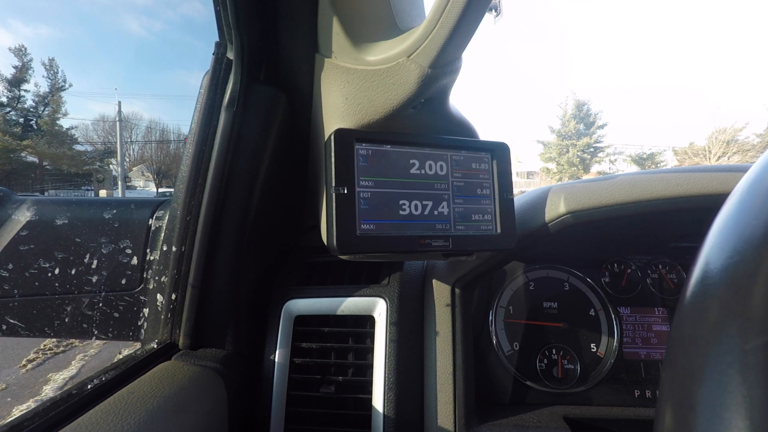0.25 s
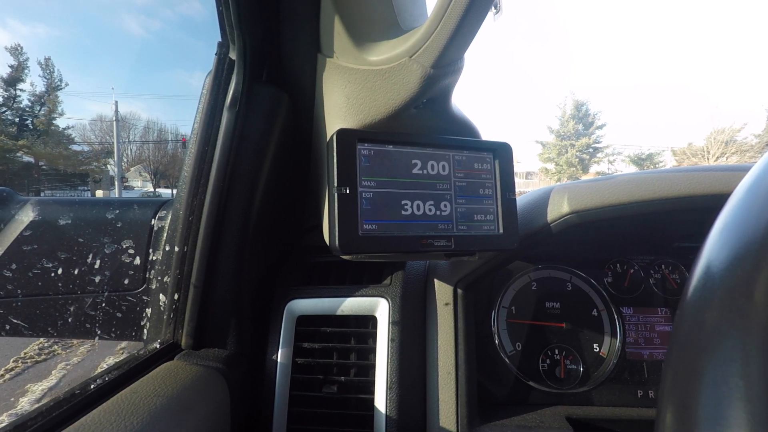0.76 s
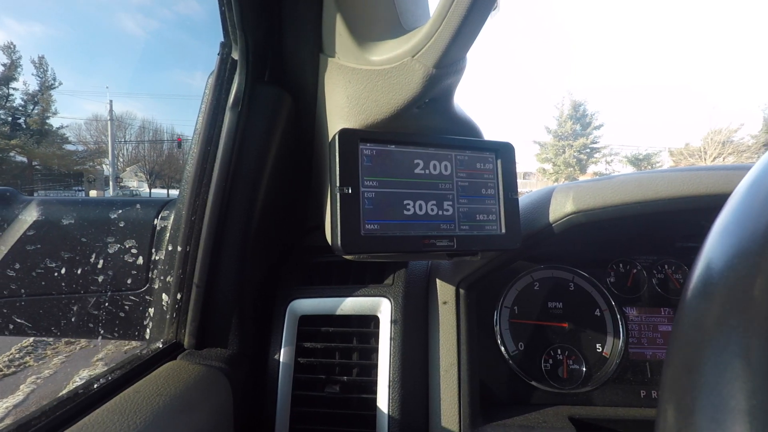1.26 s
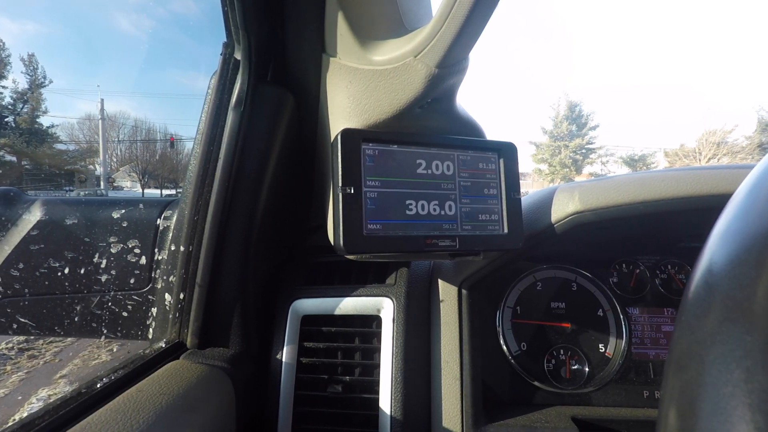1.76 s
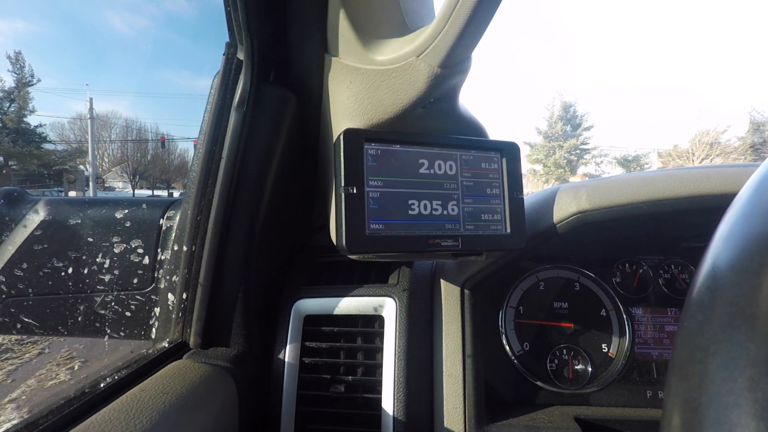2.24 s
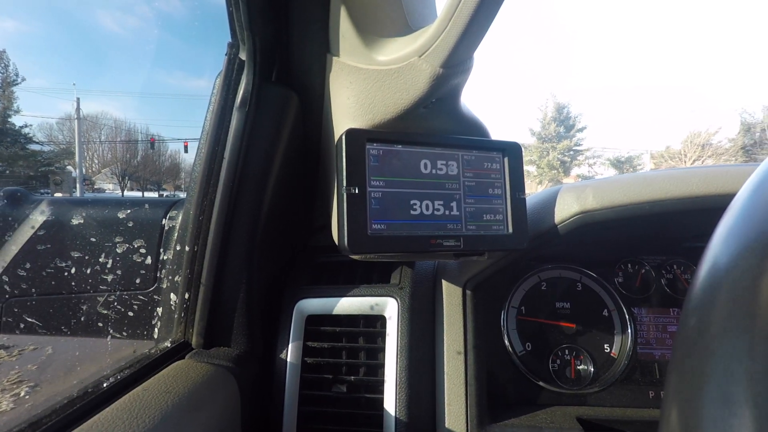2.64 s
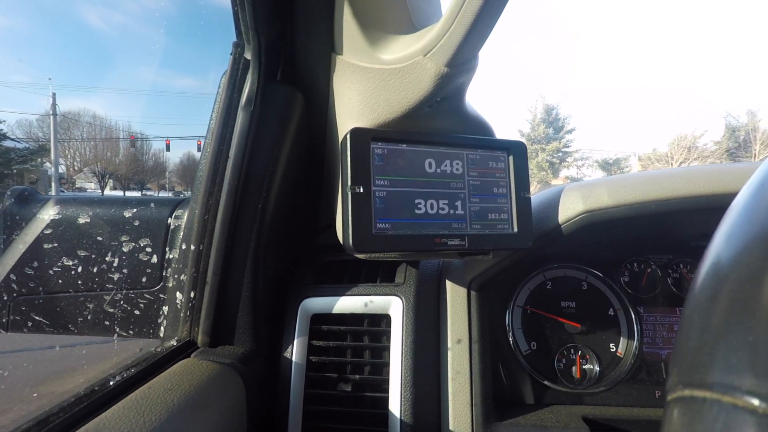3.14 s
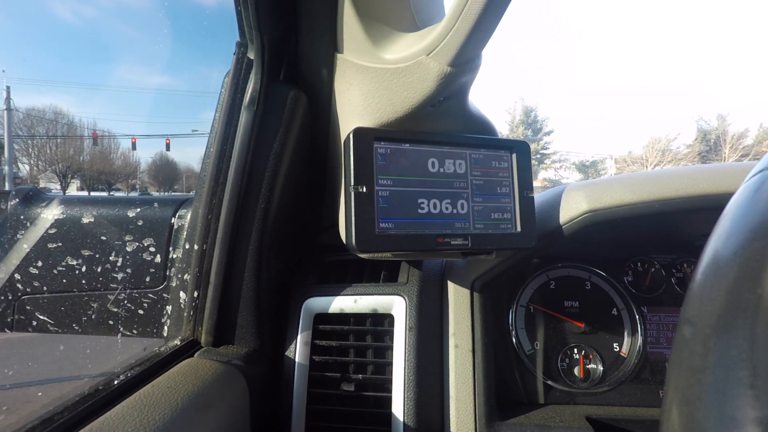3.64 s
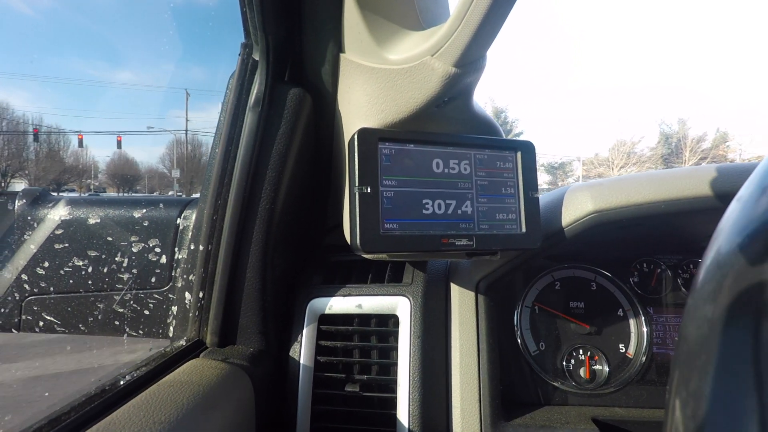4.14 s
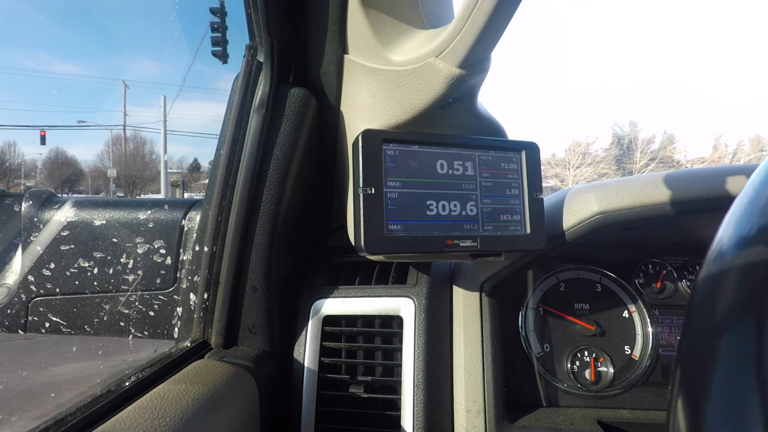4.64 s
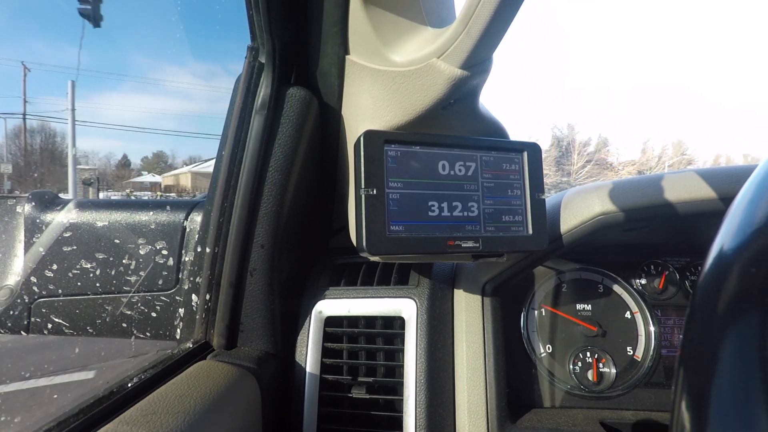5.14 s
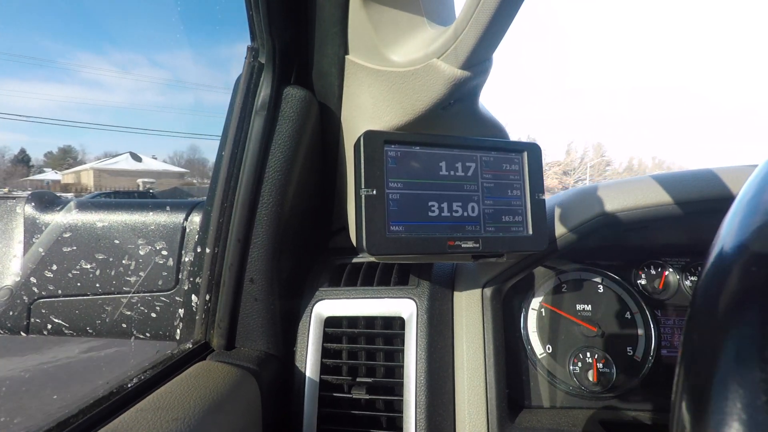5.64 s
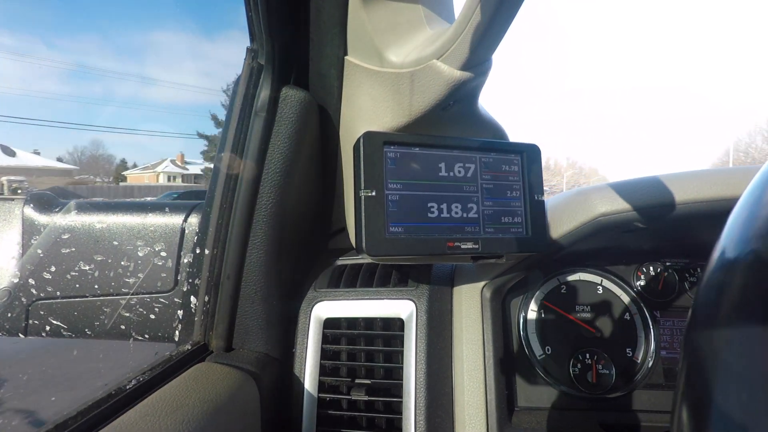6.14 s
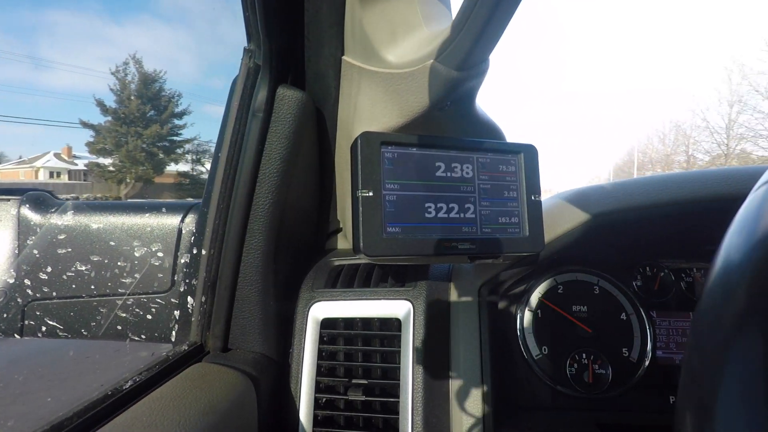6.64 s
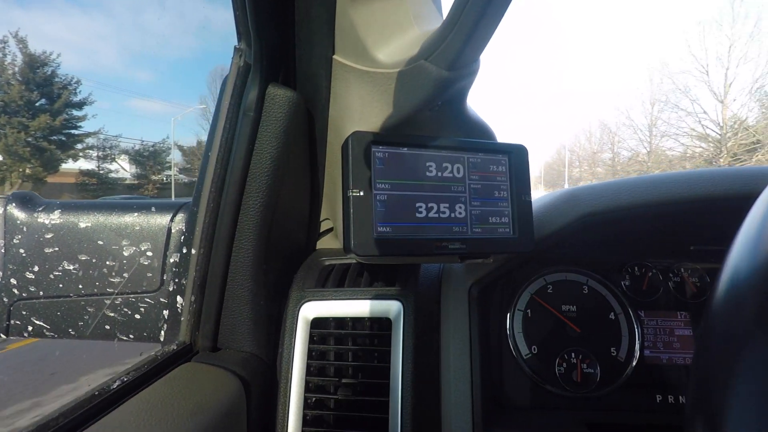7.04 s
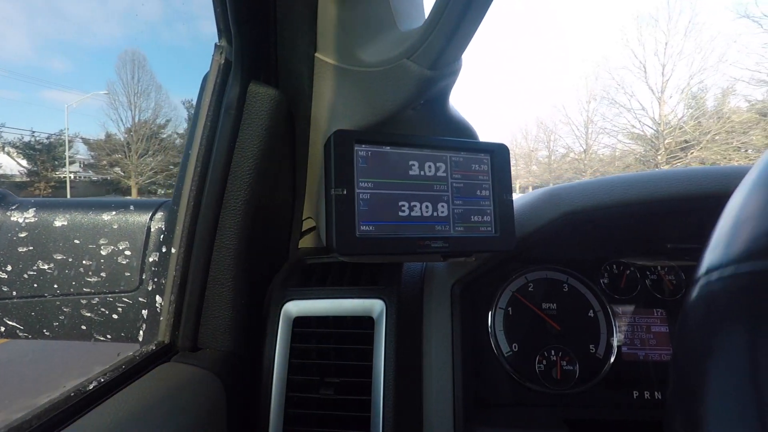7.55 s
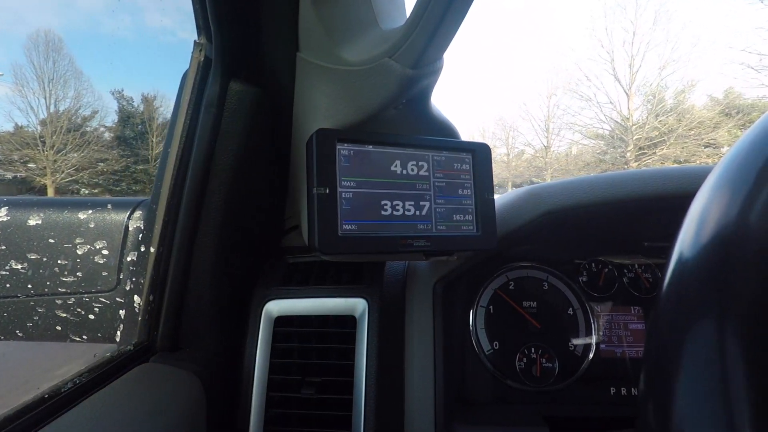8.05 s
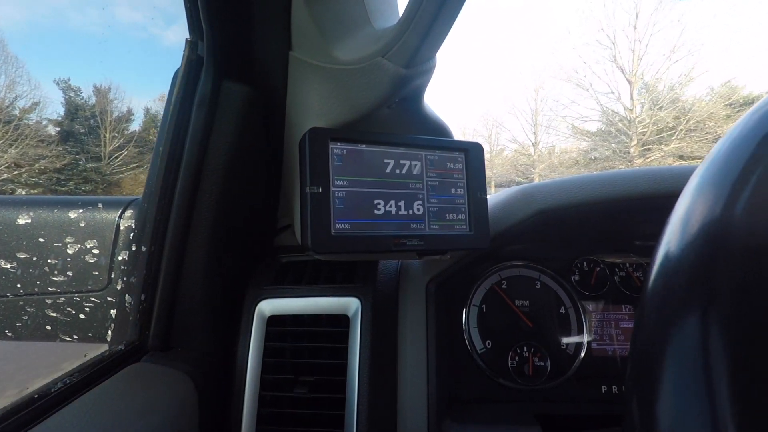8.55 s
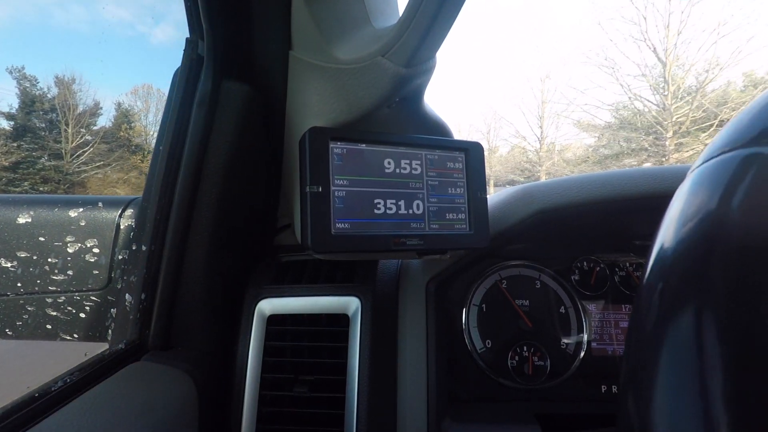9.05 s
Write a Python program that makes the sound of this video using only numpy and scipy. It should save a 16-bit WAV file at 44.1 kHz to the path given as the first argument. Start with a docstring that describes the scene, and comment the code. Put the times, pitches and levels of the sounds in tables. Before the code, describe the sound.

A turbo-diesel pickup idles low, then pulls away and accelerates with a booming exhaust and one upshift, heard inside the cab.

```python
"""A six-cylinder turbo-diesel pickup, heard from one microphone inside the cab. It idles, pulls away
through a turn and accelerates, with one soft upshift. The exhaust booms through the cab's air
resonances, combustion knock rings the block beyond the firewall, and road roar grows with speed.
Close by, the trim ticks and creaks and the steering wheel rubs through a hand; underneath, the body
shakes over bumps."""
import sys
import numpy as np
from scipy import signal
from scipy.fft import rfft, irfft, next_fast_len
from scipy.io import wavfile

SR = 44100
rng = np.random.default_rng(int(sys.argv[2]) if len(sys.argv) > 2 else 0)


def materialize(psi):
    """Save the field psi as 16-bit PCM at rate SR to the path in sys.argv[1].

    A 1-D psi becomes a single channel; in a 2-D psi each row is a channel.
    """
    bounded = np.clip(np.atleast_2d(psi).T, -1, 1)
    quanta = np.round(bounded * 32767).astype(np.int16)
    wavfile.write(sys.argv[1], SR, quanta)


N = 409688
TIME = np.arange(N) / SR
OPEN_S = 2.15  # the throttle starts to open

# Engine speed, six firings to a cycle: time_s, firing_hz
ENGINE_SPEED = [(0.0, 34.8), (2.15, 34.69), (2.4, 47.05), (2.6, 51.3), (3.23, 55.35), (3.97, 56.33),
                (4.37, 55.74), (4.84, 56.77), (5.35, 59.9), (5.75, 64.05), (6.21, 67.13), (6.94, 75.98),
                (7.27, 71.66), (7.75, 75.48), (8.23, 85.45), (8.56, 88.76), (8.9, 93), (9.29, 95.68)]
def crankshaft(start_firing=3.75, wobble=.001):
    """The engine turns slightly unevenly; gives its firing rate and the running count of firings."""
    firing_hz = curve(ENGINE_SPEED)
    return firing_hz, start_firing + np.cumsum(firing_hz * (1 + wobble * drift(20))) / SR


def throttle(opening_s=0.2):
    """The throttle goes from shut (zero) to open (one)."""
    return np.clip((TIME - OPEN_S) / opening_s, 0, 1)


# Engine load, the base level of exhaust, drone and rush: time_s, level_db
ENGINE_LOAD = [(0, -66), (2.15, -66), (2.33, -53), (2.7, -50), (3.5, -49), (5.6, -48.5), (6.6, -46),
               (7.6, -45), (8.4, -42), (9.3, -40)]
# Peaks and notches of the exhaust boom at the microphone: frequency_hz, gain_db
CAB_BOOM = [(44, 22), (52, 18.5), (56, 23.5), (63, 33), (67, 20.5), (70, 19), (73, 12.5), (78, 17.5),
            (85, 12), (95, 17), (103, 23), (111, 14.5), (114, 3), (120, 12.5), (141, 12), (147, 20.5),
            (151, 23), (158, 4), (186, -6)]
def exhaust(firing_hz, firings, flutter_db=.9, shift_s=7.0, shift_width_s=0.08, shift_db=-11.5):
    """The firing tone and its octave boom through the cab, dipping as fuel is cut for the upshift."""
    angle = 2 * np.pi * firings
    load_db = curve(ENGINE_LOAD) + shift_db * bell(shift_s, shift_width_s)
    low = amp(load_db + read(CAB_BOOM, firing_hz) + flutter_db * drift(29)) * np.cos(angle)
    octave_gain = amp(load_db + read(CAB_BOOM, 2 * firing_hz) + flutter_db * drift(11))
    octave = octave_gain * np.cos(2 * angle + 2 * np.pi * rng.random())
    return np.sqrt(2) * throttle() * (low + octave)


# Engine-cycle harmonics from unequal cylinders: harmonic, gain_db
CYCLE_HARMONICS = [(5, 2), (7, 1), (9, 3), (10, 0), (11, 4), (13, -2), (14, 0), (15, 7), (16, 2), (17, 4),
                   (18, 0), (19, 1), (20, -1), (21, 5), (23, -1), (24, 2), (25, -2), (26, 2), (27, 1),
                   (29, 2), (30, -2), (33, 4), (39, 3), (42, 3), (48, 4), (54, 2), (58, 3), (60, 6),
                   (66, 4), (78, 4)]
# Air resonances of the cab around the microphone: frequency_hz, gain_db
CAB_AIR = [(25, -6), (60, -16), (105, 1), (125, -10), (147, 7), (168, -5), (191, -1.5), (210, -9),
           (235, -4.5), (252, -10), (270, -2.5), (284, -5), (296, -16), (312, -5.5), (323, -17),
           (350, -8.5), (385, -18), (460, -26), (502, -20), (545, -25), (590, -33), (655, -27), (745, -26),
           (845, -31), (930, -42), (1300, -34), (1700, -42)]
# Sharp resonances where one harmonic swells or sinks: harmonic, resonance_hz, lift_db
HARMONIC_SWELLS = [(9, 107, 13), (9, 140, 4), (10, 153, 7), (11, 158, 7), (14, 146, 6), (14, 204, 7),
                   (15, 192, 7), (15, 166, -8), (15, 228, -8), (17, 244, 4), (17, 262, -8), (18, 286, 14.5),
                   (21, 194, -8), (21, 232, 6), (21, 283, 13), (21, 310, -6), (23, 274, 16), (24, 379, 9),
                   (25, 274, 9.5), (27, 274, 5), (30, 269, 11), (60, 665, 6.5), (54, 785, 9),
                   (78, 733, 4.5)]
def drone(firing_hz, firings, upper_db=-4, uneven_db=1.5, swell_width=.031):
    """Unequal cylinders fill in the cycle harmonics, which swell as they climb through cab resonances."""
    step = 64  # samples per gain value
    cycles, cycle_hz, t = firings / 6, firing_hz[::step] / 6, TIME[::step]
    load_db = curve(ENGINE_LOAD, step=step)
    levels = {k: upper_db + uneven_db * rng.standard_normal() for k in range(28, 96)}
    levels.update(CYCLE_HARMONICS)
    turn = np.exp(2j * np.pi * cycles)
    wave, out = np.ones(N, complex), np.zeros(N)
    for k in range(1, max(levels) + 1):
        wave *= turn  # now harmonic k
        if k in levels:
            # high harmonics come and go more than low ones
            waver_db = (1 + k / 70) * np.interp(t * 5, np.arange(50), rng.standard_normal(50))
            swell_db = sum(db * np.exp(-((k * cycle_hz / hz - 1) / swell_width) ** 2)
                           for harmonic, hz, db in HARMONIC_SWELLS if harmonic == k)
            gain = amp(load_db + levels[k] + read(CAB_AIR, k * cycle_hz) + swell_db + waver_db)
            phase = np.exp(2j * np.pi * rng.random())
            out += (np.repeat(gain * phase, step)[:N] * wave).real
    return np.sqrt(2) * out


CHUG_LAG = .55  # the chug trails a firing by this share of the firing period
# Hum of the unloaded engine, in harmonics of its cycle: harmonic, level_db
IDLE_HUM = [(6, -48), (12, -39.5), (15, -53), (17, -47), (18, -44), (23, -53), (24, -51), (25, -56),
            (26, -60), (30, -59), (36, -58), (52, -64), (55, -64), (84, -71)]
def idle(firings):
    """Close harmonics meet in one chug each engine cycle, until the throttle opens."""
    cycles = (firings - CHUG_LAG) / 6
    hum = -sum(amp(db + k / 75 * drift(24)) * np.sin(2 * np.pi * k * cycles) for k, db in IDLE_HUM)
    return np.sqrt(2) * hum * (1 - throttle())


def rush(gain_db=-3.5, cutoff_hz=1200):
    """Low turbulence in the exhaust follows the load and stirs the cab's resonances."""
    muffle = signal.butter(4, cutoff_hz, fs=SR)
    return amp(curve(ENGINE_LOAD) + gain_db) * signal.lfilter(*muffle, noise(CAB_AIR))


# The engine block, heard through the firewall: frequency_hz, gain_db
BLOCK_SPECTRUM = [(100, -21), (300, -3.5), (600, -4), (850, -1), (980, -7.5), (1180, 4.5), (1300, -1),
                  (1520, 0.9), (1750, -21.5), (2600, -27), (5000, -46), (14000, -59.5)]
# Ringing modes of the block: pitch_hz, width_hz, gain_db
BLOCK_MODES = [(1290.6, 190, -0.5), (838, 15, -6)]
def knock(firing_hz, firings, base_db=-66.5, db_per_octave=13, shut_lift_db=2.5,
          fade_s=0.022, scatter_db=1.0, repeat_share=0.57, ring_db=-74):
    """Each firing sends a burst into the block, louder with engine speed and with the throttle shut."""
    strength = amp(scatter_db * rng.standard_normal(1024)[firings.astype(int)])
    burst = strength * np.exp(-(firings % 1) / firing_hz / fade_s)
    # one part is alike in all cylinders, one repeats every engine cycle, one never repeats
    shared = np.interp(firings % 1, np.linspace(0, 1, 200), rng.standard_normal(200))
    own = np.interp(firings % 6 / 6, np.linspace(0, 1, 1200), rng.standard_normal(1200))
    fresh = 3 * rng.standard_normal(N)
    drive = burst * (np.sqrt(repeat_share) * unit(0.85 * shared + own)
                     + np.sqrt(1 - repeat_share) * fresh)
    ring = sum(amp(db) * unit(signal.lfilter(*signal.iirpeak(hz, hz / width, SR), drive))
               for hz, width, db in BLOCK_MODES)
    level_db = base_db + db_per_octave * np.log2(firing_hz / 55) + shut_lift_db * (1 - throttle())
    return amp(level_db) * colour(drive, BLOCK_SPECTRUM) + amp(ring_db) * unit(ring)


# Strength of each cylinder's clatter, in firing order: gain_db
CYLINDER_GAINS = [-0.5, -0.5, 4, 5, 3.5, 0.5]
def clatter(firing_hz, firings, level_db=-65.7, scatter_db=1.1, slip_rad=0.8):
    """Every injection rings the block once, each cylinder with its own strength and phase."""
    shot, progress = firings.astype(int), firings % 1
    strength = amp(np.array(CYLINDER_GAINS)[shot % 6] + scatter_db * rng.standard_normal(1024)[shot])
    swell = np.sin(np.pi * progress) ** 1.3 * strength
    ring = 0
    for hz, _, db in BLOCK_MODES:
        phase = 2 * np.pi * rng.random(6)[shot % 6] + slip_rad * rng.standard_normal(1024)[shot]
        ring += amp(db) * np.cos(2 * np.pi * hz * progress / firing_hz + phase)
    return amp(level_db) * unit(swell * ring)


# Drivetrain whine in the cab: time_s, pitch_hz, level_db, octave_level_db
GEAR_WHINE = [(6.45, 357, -68, -72), (6.9, 391, -56, -63), (7.07, 401, -56, -61.5), (7.3, 403, -55, -76),
              (7.9, 423, -56, -80), (8.6, 467, -75, -90)]
def gears(waver_db=3.0):
    """The drivetrain whine climbs with road speed, even through the upshift, where its octave sings."""
    angle = 2 * np.pi * np.cumsum(curve(GEAR_WHINE)) / SR
    tone = amp(curve(GEAR_WHINE, column=2)) * np.cos(angle)
    octave = amp(curve(GEAR_WHINE, column=3)) * np.cos(2 * angle)
    fade_in = np.clip((TIME - GEAR_WHINE[0][0]) * 10, 0, 1)
    return np.sqrt(2) * fade_in * amp(waver_db * drift(4.7)) * (tone + octave)


# Road roar, heard through the body: frequency_hz, gain_db
ROAD_SPECTRUM = [(15, -5), (35, -1), (60, -5), (100, -7.5), (160, -13), (260, -19.5), (350, -22),
                 (450, -26), (590, -32), (700, -33), (1000, -41), (2000, -43.5), (4000, -54), (9000, -64)]
def road(firings, base_db=-42.5, rise_db=11, rise_s=7.54, fade_in_s=1.5, throb=0.13, bump_db=-21):
    """Tyre and drivetrain roar grows as the truck gathers speed and throbs with the firings."""
    moving_s = np.maximum(TIME - OPEN_S, 0)
    fade_in = np.clip(moving_s / fade_in_s, 0, 1)
    level = fade_in * amp(base_db + rise_db * (moving_s / rise_s) ** 3.7)
    pulse = 1 + throb * np.cos(2 * np.pi * firings)
    return np.hypot(level, amp(bump_db) * jolt()) * noise(ROAD_SPECTRUM) * pulse


# Bumps under the wheels: centre_s, half_width_s, level_db
ROAD_BUMPS = [(2.5, 0.32, -24), (6.15, 0.7, -27), (6.9, 0.14, -20.5), (7.27, 0.16, -24.5),
              (8.001, 0.11, -24), (8.3, 0.17, -20.5), (8.798, .13, -15), (9.23, 0.14, -14.5)]
def jolt():
    """Strength of the bumps, each swelling and dying away."""
    return sum(amp(db) * bell(s, width) for s, width, db in ROAD_BUMPS)


def shake(firings, rock_db=-30.5, hop_db=-33, hop_hz=13.0, wander_hz=1.0):
    """At idle the crank rocks the body once a turn; once rolling, the wheels hop on their springs."""
    rolling = np.clip(TIME - OPEN_S, 0, 1)
    rock = -amp(rock_db) * np.cos(2 * np.pi * (firings - CHUG_LAG) / 3)
    hop_angle = 2 * np.pi * np.cumsum(hop_hz + wander_hz * drift(5.4)) / SR
    hop = np.hypot(amp(hop_db), jolt()) * np.cos(hop_angle)
    return np.sqrt(2) * (np.sqrt(1 - rolling) * rock + np.sqrt(rolling) * hop)


# Lowest resonance of the panels around the microphone: frequency_hz, gain_db
PANEL_SPECTRUM = [(25, -25), (46, 0), (80, -35), (300, -80)]
def panels(at_s=4.85, width_s=0.87, level_db=-33):
    """Rough pavement in the turn sets the cab's panels booming."""
    return amp(level_db) * bell(at_s, width_s) * noise(PANEL_SPECTRUM)


# Small plastic ticks, close by: start_s, level_db, treble_db
TRIM_TICKS = [(0.56, -48, -6), (0.573, -49.5, -6), (0.724, -50, -13), (0.737, -51.5, -15),
              (1.1939, -53, -16), (1.3825, -49, -13), (3.457, -49, -22), (3.466, -46, -19),
              (3.6037, -49, -10), (3.613, -47, -19), (4.043, -49, -5), (4.464, -47, -25),
              (4.5258, -47, -20)]
# Colour of a tick: frequency_hz, gain_db
TICK_SPECTRUM = [(1000, -18), (2500, -3), (4000, -2), (5500, 4.5), (8000, 0.5), (14000, 0)]
# Knocks and rattles of the dashboard: start_s, level_db, tilt_db_per_octave, t60_s
DASH_CLACKS = [(1.427, -53.5, -0.5, .05), (2.694, -48.5, -3, 0.057), (4.352, -40.5, -8.5, 0.051),
               (4.865, -28.5, -2, 0.026), (5.986, -38, -6, 0.037), (7.748, -42.5, -7.5, 0.036),
               (8.661, -46.5, 2.5, 0.064), (9.163, -43.5, 0.5, 0.07), (9.208, -46, -2, 0.048),
               (9.248, -42.5, 2.4, 0.039)]
# Colour of the dashboard: frequency_hz, gain_db
DASH_SPECTRUM = [(150, -38), (420, -1), (1000, 0), (1300, 5), (2100, 0), (3200, -12), (4400, -9),
                 (5500, -13), (8200, -15), (11000, -20), (15000, -32)]
def trim(tick_gain_db=2.0, tick_t60_s=0.023, tilt_per_treble=0.52, clack_gain_db=2.5):
    """The cab's plastic gives light ticks and heavier knocks near the microphone."""
    out = np.zeros(N)
    for s, db, treble_db in TRIM_TICKS:
        add(out, s, amp(db + tick_gain_db) * tap(TICK_SPECTRUM, tilt_per_treble * treble_db, tick_t60_s))
    for s, db, tilt, t60_s in DASH_CLACKS:
        add(out, s, amp(db + clack_gain_db) * tap(DASH_SPECTRUM, tilt, t60_s))
    return out


def tap(spectrum, tilt, t60_s, rise_s=0.0017):
    """A short dying burst in the dense modes of a plastic panel."""
    t = np.arange(4096) / SR
    burst = colour(rng.standard_normal(len(t)), spectrum, tilt)
    return burst * amp(-60 * t / t60_s) * (1 - np.exp(-t / rise_s))


# Spells of creaking in the nearby trim: start_s, end_s, level_db, tilt_db_per_octave
CREAK_SPELLS = [(.745, .92, -52, 0), (.975, 1.03, -51, -1), (1.28, 1.33, -55, 0), (3.245, 3.33, -51, -3),
                (3.34, 3.43, -49, -4), (3.7, 3.82, -55, -2), (3.92, 4.11, -50, 4), (4.13, 4.28, -58, 0),
                (4.55, 4.67, -57, 1)]
# Colour of one snap of the plastic: frequency_hz, gain_db
SNAP_SPECTRUM = [(1500, -28), (3000, -10), (4000, 0), (5700, 0), (7500, -11), (14000, -22)]
def creak(slips_per_s=68, jitter=.35, spread_db=1.8, ends_db=-6, t60_s=.009):
    """Plastic sticks and slips in nearly even runs of tiny snaps that swell and fade."""
    out = np.zeros(N)
    for start, end, db, tilt in CREAK_SPELLS:
        for s in np.arange(start, end, 1 / slips_per_s):
            arch_db = ends_db * (1 - np.sin(np.pi * (s - start) / (end - start)))
            gain = amp(db + arch_db + spread_db * rng.standard_normal())
            snap = gain * tap(SNAP_SPECTRUM, tilt, t60_s, rise_s=0.00051)
            add(out, s + jitter * rng.random() / slips_per_s, snap)
    return out


# A hand sliding on the steering wheel, within arm's reach: start_s, end_s, level_db
HAND_STROKES = [(3.28, 3.65, -72.5), (3.9, 4.32, -71), (4.43, 4.72, -73.5), (5.8, 6.1, -74.5),
                (6.66, 7.08, -67.6), (7.04, 7.64, -74)]
# Rub of a palm on the rim: frequency_hz, gain_db
PALM_SPECTRUM = [(1500, -8), (3000, 0), (6500, 2.5), (10000, -2), (14000, -2.5)]
def steering_wheel(grain_db=2.0, edge_s=.08):
    """The rim rubs through a palm in small catches; each stroke fades in, holds and fades out."""
    level = sum(amp(db) * np.clip(np.minimum(TIME - start, end - TIME) / edge_s, 0, 1)
                for start, end, db in HAND_STROKES)
    return level * amp(grain_db * drift(91)) * noise(PALM_SPECTRUM)


# Brake hiss, faint in the cab: frequency_hz, gain_db
BRAKE_SPECTRUM = [(3500, -19), (4300, -10), (4650, -4), (5000, -14), (5500, -26), (9000, -40)]
def brake(at_s=1.76, width_s=0.19, level_db=-75):
    """A soft narrow hiss as the brake is let go."""
    return amp(level_db) * bell(at_s, width_s) * noise(BRAKE_SPECTRUM)


# The engine bay, beyond the firewall: frequency_hz, gain_db
BAY_SPECTRUM = [(35, -8), (60, -13), (260, -16.5), (350, -20), (450, -26), (590, -31), (750, -33),
                (1000, -40), (2000, -45.5), (6000, -61)]
def bay_murmur(level_db=-47):
    """The engine bay murmurs steadily, even at rest."""
    return amp(level_db) * noise(BAY_SPECTRUM)


# Background hiss at the microphone: frequency_hz, gain_db
HISS_SPECTRUM = [(100, 7), (1000, 10.5), (2000, -4.5), (3500, -5.5), (6000, -4), (10000, -6.5),
                 (13000, -11.5), (15000, -16.5)]
def hiss(level_db=-68.0):
    """A faint steady hiss lies under everything."""
    return amp(level_db) * noise(HISS_SPECTRUM)


def amp(db):
    """Decibels to gain."""
    return 10 ** (np.asarray(db) / 20)


def unit(x):
    """Scales to an rms of one."""
    return x / np.sqrt(np.mean(x ** 2) + 1e-20)


def bell(at_s, width_s):
    """A smooth swell to one and back."""
    return np.exp(-((TIME - at_s) / width_s) ** 2)


def curve(rows, column=1, step=1):
    """One column of a timed table, interpolated every step samples."""
    rows = np.asarray(rows)
    return np.interp(TIME[::step], rows[:, 0], rows[:, column])


def read(spectrum, hz):
    """A spectrum in dB at the given frequencies."""
    points_hz, db = np.transpose(spectrum)
    return np.interp(np.log(np.maximum(hz, 1)), np.log(points_hz), db)


def colour(x, spectrum, tilt=0):
    """Filters by a spectrum, tilted in dB per octave; rms one."""
    hz = np.fft.rfftfreq(len(x), 1 / SR)
    gain_db = read(spectrum, hz) + tilt * np.log2(np.maximum(hz, spectrum[0][0]))
    return unit(irfft(rfft(x) * amp(gain_db), len(x)))


def noise(spectrum):
    """Steady noise with a given spectrum."""
    return colour(rng.standard_normal(next_fast_len(N, True)), spectrum)[:N]


def drift(rate):
    """A random wander through this many values a second."""
    return np.interp(TIME * rate, np.arange(2048), rng.standard_normal(2048))


def add(mix, s, sound):
    """Mixes a sound in at a time."""
    part = mix[round(s * SR):][:len(sound)]
    part += sound[:len(part)]


def scene():
    """Engine, road and cab noises meet at one microphone by the dashboard."""
    firing_hz, firings = crankshaft()
    engine = exhaust(firing_hz, firings) + drone(firing_hz, firings) + idle(firings) + rush()
    engine += knock(firing_hz, firings) + clatter(firing_hz, firings) + gears() + bay_murmur()
    cab = shake(firings) + panels() + trim() + creak() + brake() + steering_wheel() + hiss()
    return (engine + road(firings) + cab)[None]


def record(dry, edge_hz=15200):
    """The recorder's band limit takes off the highest treble."""
    lowpass = signal.firwin(511, edge_hz, window=("kaiser", 9), fs=SR)
    return signal.oaconvolve(dry, lowpass[None], "same")


dry = scene()
out = record(dry)
materialize(out)
```